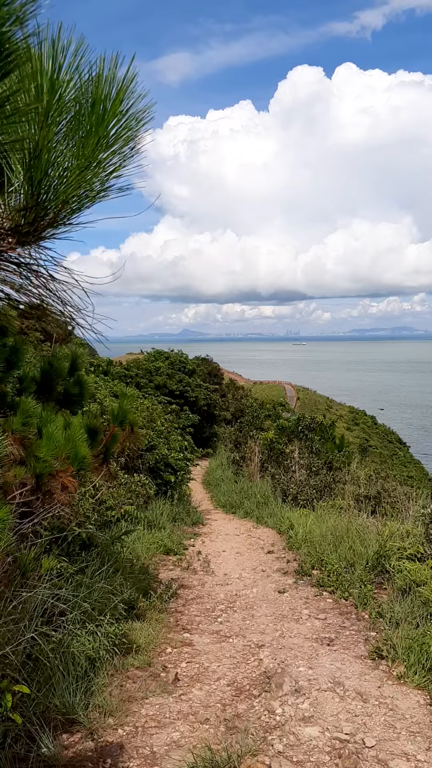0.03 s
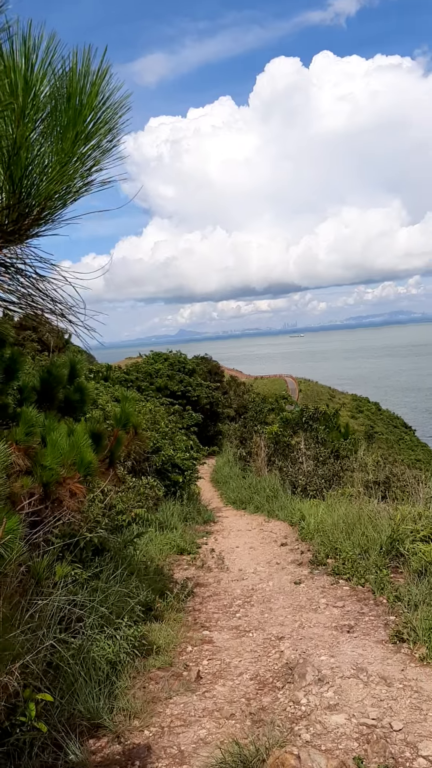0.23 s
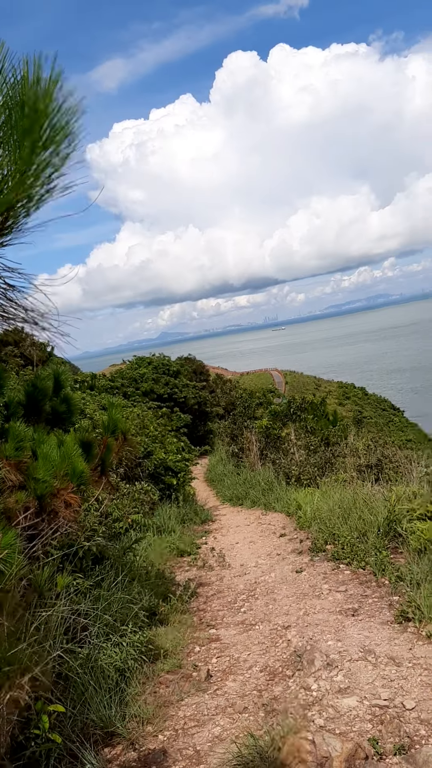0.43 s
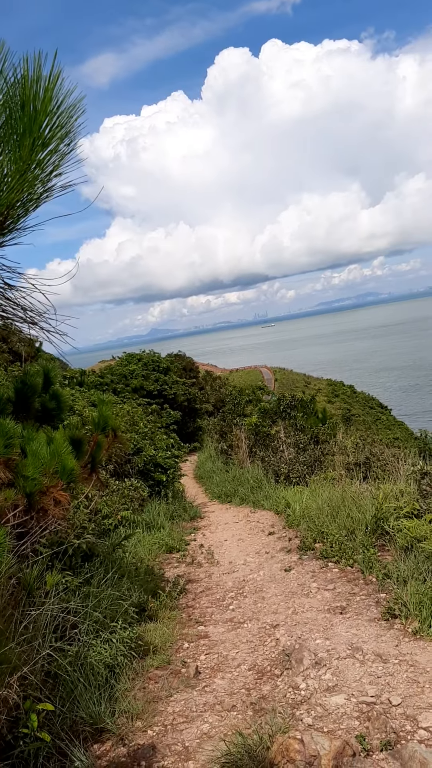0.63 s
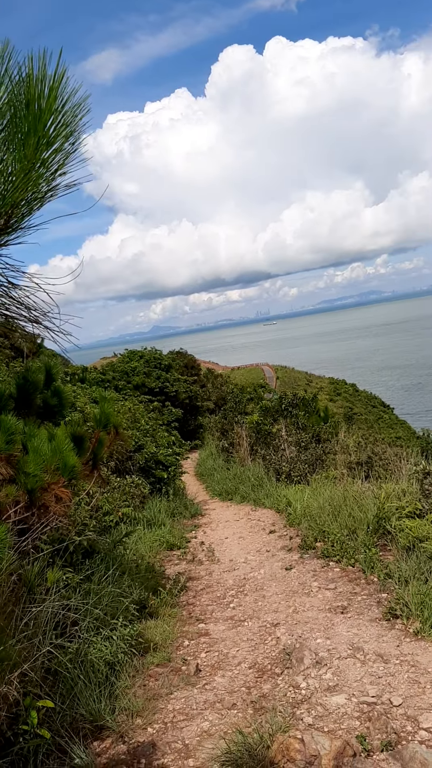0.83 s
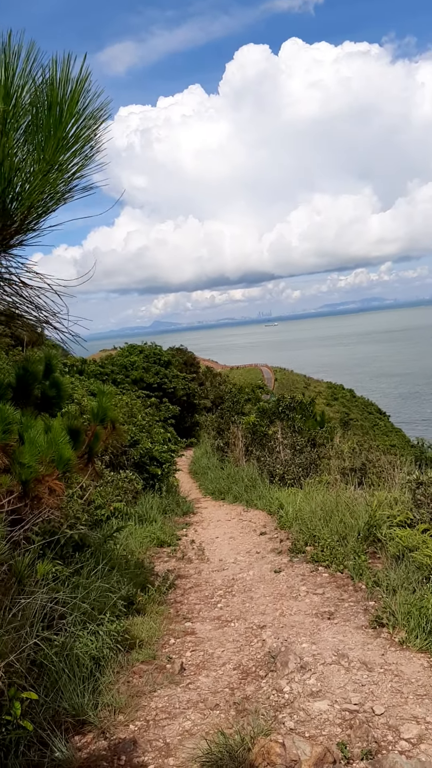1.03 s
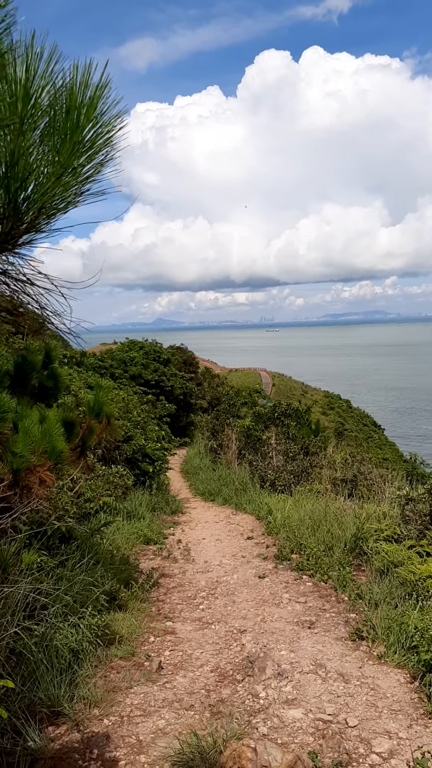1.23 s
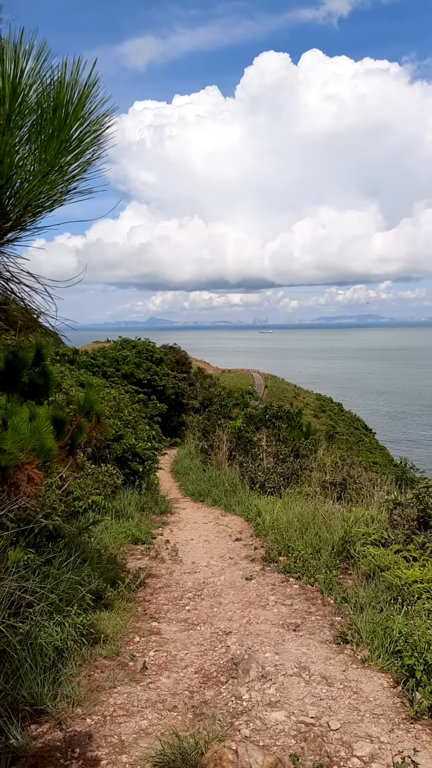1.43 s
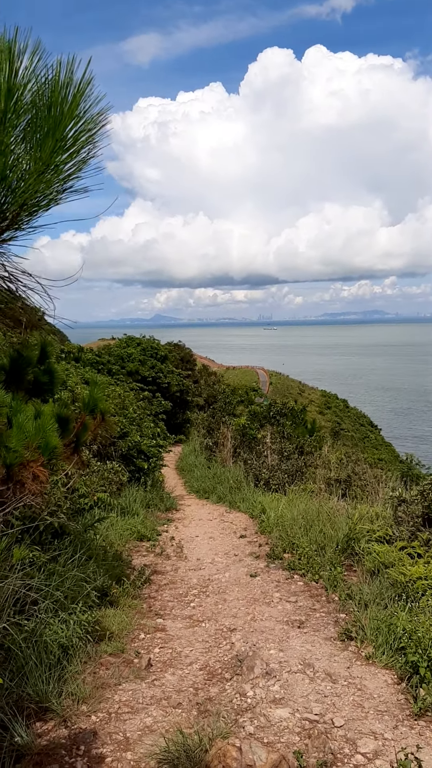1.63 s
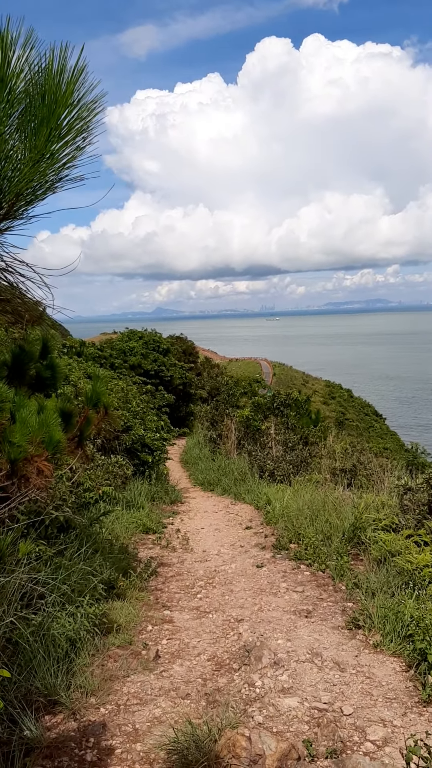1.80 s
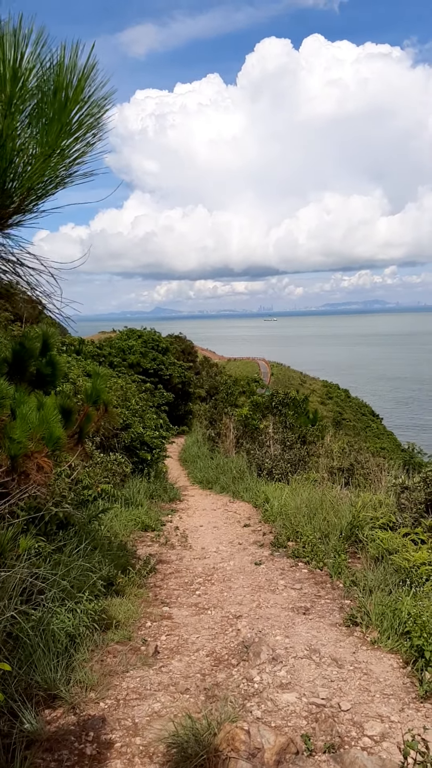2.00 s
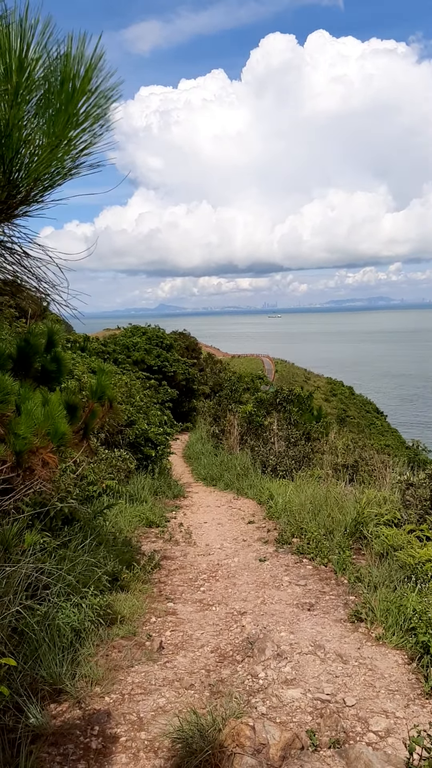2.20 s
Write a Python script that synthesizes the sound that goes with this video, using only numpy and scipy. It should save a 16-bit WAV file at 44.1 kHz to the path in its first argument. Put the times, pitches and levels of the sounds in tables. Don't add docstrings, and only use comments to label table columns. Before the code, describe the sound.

A close cicada sings a loud, unbroken, high rattling buzz over a faint low hum outdoors.

```python
import sys
import numpy as np
from scipy import signal
from scipy.fft import rfft, irfft, next_fast_len
from scipy.io import wavfile
from scipy.ndimage import uniform_filter1d, map_coordinates

SR = 44100
rng = np.random.default_rng(int(sys.argv[2]) if len(sys.argv) > 2 else 0)


def dump(signal):
    limited = np.clip(np.atleast_2d(signal).T, -1, 1)
    pcm = np.round(limited * 32767).astype(np.int16)
    wavfile.write(sys.argv[1], SR, pcm)


def rack_gain(trim_db):
    fader = np.asarray(trim_db, float)
    return 10 ** (fader / 20)


N = 99445


def unit(x):
    return x / np.sqrt(np.mean(x ** 2) + 1e-20)


def along(points, hz):
    f, v = np.transpose(points)
    return np.interp(np.log(hz + 1), np.log(f + 1), v)


def curves(rows, t):
    s, *columns = np.transpose(rows)
    return [np.interp(t, s, column) for column in columns]


def wobble(rate, t):
    return map_coordinates(rng.standard_normal(int(N * rate / SR) + 6), [t * rate])


def filtered(x, response):
    m = next_fast_len(N + 8192)
    return irfft(rfft(x, m) * response(np.fft.rfftfreq(m, 1 / SR)), m)[..., :N]


def mode(f, hz, width, db):
    return rack_gain(db) * 1j * f * width / (hz * hz - f * f + 1j * f * width)


def pulses(times, sizes):
    at = np.ravel(times)[:, None] * SR
    k = np.floor(at) + np.arange(-7, 9)
    shape = np.sinc(k - at) * np.cos(np.pi * (k - at) / 16) ** 2
    place = np.clip(k, 0, N + 9).astype(int)
    heights = shape * np.ravel(sizes)[:, None]
    return np.bincount(place.ravel(), heights.ravel(), N + 10)[:N]


def noise(points, patchy_db):
    z = signal.stft(rng.standard_normal((2, N)), nperseg=512)[2]
    field = uniform_filter1d(rng.standard_normal(z.shape), size=5, axis=1)
    field = uniform_filter1d(field, size=12, axis=2)
    pair = signal.istft(z * rack_gain(patchy_db * unit(field)), nperseg=512)[1][:, :N]
    return unit(filtered(pair, lambda hz: rack_gain(along(points, hz)) * (hz > 15)))


def buckling_cycles(t):
    # (time [s], rate [Hz])
    buckling = [(0.07, 215.4), (0.3, 215.45), (0.66, 215.75), (1.18, 216.2), (1.68, 216.8), (2.25, 217.2)]
    rate, = curves(buckling, t)
    cycles = np.cumsum(rate) / SR
    first_click_s = 0.0710
    return cycles - np.interp(first_click_s, t, cycles)


def song_band(f):
    below = 5240 / (1j * f + 1)
    above = 1j * f / 9070
    low_edge = 1 / (1 + np.sqrt(2) * below + below ** 2) ** 4
    high_edge = 1 / (1 + np.sqrt(2) * above + above ** 2) ** 3
    return low_edge * high_edge


def side_modes(f, side):
    # (frequency [Hz], width [Hz], first tymbal level [dB], second tymbal level [dB])
    body_modes = [(4928, 168, -9.5, 0.5), (5420, 546, -9.5, -8), (6328, 197, -18, -14.5),
                  (8597, 178, -32, -8), (9387, 203, -11.5, -8)]
    total = 0
    for k, (hz, width, *db) in enumerate(body_modes):
        total = total + (-1) ** k * mode(f, hz, width, db[side])
    return total


def rib_snap(f):
    lead_ms = 0.294
    return mode(f, 15070, 1900, 0) ** 2 * np.exp(2j * np.pi * f * lead_ms / 1000)


def cicada():
    # (time [s], level [dB], left-right balance [dB], brightness [0-1],
    # right shade [dB], side mode level [dB])
    song = [(0.07, -23.5, -0.5, 0.81, -2, -2), (0.21, -22.5, 3.5, 0.88, 3, 1.5),
            (0.33, -23, -0.5, 0.68, 2, 6), (0.51, -22.5, -2.5, 0.08, 3.5, 5), (0.66, -21.5, -4, 1, -2.5, 3),
            (0.75, -21.5, -4, 1, -3, -3), (1.01, -23.5, 1, 0.46, 4.5, -2),
            (1.18, -22.5, -0.5, 0.21, -9, -4), (1.24, -24.5, 4.5, 0.2, -6, -7.5),
            (1.37, -25, 3.5, 0.3, -18, -8), (1.68, -23.5, -1, 0.1, -15, -3.5), (1.78, -24, 0, 0.65, -4, -3),
            (1.9, -23, -1, 0.55, -20, -0.5), (1.98, -24.5, 1.5, 0.8, -6, 0.5),
            (2.08, -23.5, -2, 0.6, -1, -2.5), (2.25, -23.5, 1, 0.34, -13, -4.5)]
    # (delay [ms], left level [dB], right level [dB], drift [ms/s])
    late_arrivals = [(.55, -7, -3, 0.095), (.95, -15.5, -8, -0.049), (1.4, -14.5, -15, 0.14),
                     (1.9, -35, -14.5, -0.1), (2.9, -35, -14, 0.14), (3.7, -11.5, -9, -0.1)]
    second_place, second_db = 0.52, -1
    jitter_us, scatter_db = 3.6, 0.5
    right_lag_ms, sway_us, swell_db = 0.2189, 18.4, 3.5

    t = np.arange(N) / SR
    cycles = buckling_cycles(t)
    level_db, pan_db, brightness, shade_db, side_mode_db = curves(song, t)
    share = np.clip(brightness, 0, 1)
    paths = [[(wobble(1.516, t), wobble(2.515, t)) for echo in late_arrivals] for ear in range(2)]
    body, snap = np.zeros((2, N)), np.zeros((2, N))
    for side in range(2):
        even = np.interp(np.arange(-2, cycles[-1]) + side * second_place, cycles, t)
        i = (even * SR).astype(int)
        luck = rng.standard_normal((len(even), 2))
        at = even + jitter_us * 1e-6 * luck[:, 0]
        size = rack_gain(scatter_db * luck[:, 1] + side * second_db)
        for ear in range(2):
            times = [at + ear * right_lag_ms / 1000]
            sizes = [size * rack_gain(ear * shade_db[i])]
            for (ms, *db, drift), (sway, swell) in zip(late_arrivals, paths[ear]):
                delay_s = (ms + drift * (even - 1)) / 1000
                times.append(at + delay_s + sway_us * 1e-6 * sway[i])
                sizes.append(size * rack_gain(db[ear] + swell_db * swell[i]))
            clicks = pulses(times, sizes)
            body[ear] += filtered(clicks * rack_gain(side_mode_db), lambda f: song_band(f) * side_modes(f, side))
            body[ear] += filtered(clicks * np.sqrt(share), lambda f: song_band(f) * mode(f, 7940, 610, 0))
            body[ear] += filtered(clicks * np.sqrt(1 - share), lambda f: song_band(f) * mode(f, 7352, 425, 0))
            snap[ear] += rack_gain(side * 31) * filtered(clicks, rib_snap)
    power = np.abs(uniform_filter1d(body ** 2, size=9000, axis=1))
    steady = body / np.sqrt(power + 1e-12)
    snap_db = -28.5 + 3.5 * (t + 1.0)
    both = steady + rack_gain(snap_db) * unit(snap)
    return both * rack_gain(level_db + 2.0 + np.array([pan_db, -pan_db]) / 2)


def fly():
    # (start [s], length [s], start pitch [Hz], middle pitch [Hz], end pitch [Hz])
    passes = [
        (0.265, 0.197, 1290, 1389, 1275),
        (1.726, 0.11, 1413, 1438, 1650),
    ]
    t, whine = np.arange(N) / SR, np.zeros(N)
    for start, length, first, middle, last in passes:
        u = np.clip((t - start) / length, 0, 1)
        arc = np.sin(np.pi * u)
        hz = first + (last - first) * u + (middle - (first + last) / 2) * arc
        flutter = rack_gain(-57 + 3.1 * wobble(29.1, t))
        whine += flutter * arc ** 0.26 * np.sin(2 * np.pi * np.cumsum(hz) / SR)
    return whine * rack_gain([[2.5], [2.5]])


def twig():
    tick = filtered(pulses([1.1], [1]), lambda f: mode(f, 3500, 1100, 0) ** 2)
    return rack_gain(-27) * tick / tick.max() * rack_gain([[-6], [4]])


def far_chorus():
    # (frequency [Hz], level [dB])
    chorus_colour = [(3800, -46), (4800, 7), (6300, 13), (7800, 16.5), (9500, 2.5), (11500, -30),
                     (15000, -13), (16500, -39)]
    return rack_gain(-32) * noise(chorus_colour, patchy_db=2)


def open_air():
    # (frequency [Hz], level [dB])
    air_colour = [(150, 0), (400, -1), (1200, -4), (1700, -3), (2600, -16.5), (4000, -13), (6000, -48)]
    return rack_gain(-59) * noise(air_colour, patchy_db=1.5)


def port_breeze():
    # (frequency [Hz], level [dB])
    rumble_colour = [(13, -43), (22, -19.5), (64, 4.5), (132, -3), (167, -11.5), (190, -10), (250, -55),
                     (420, -120)]
    # (time [s], level [dB])
    gust_levels = [
        (0.07, -46),
        (0.08, -51),
        (0.29, -61.5),
        (0.4, -55),
        (0.64, -60),
        (1.99, -62.5),
        (2.02, -59.5),
        (2.25, -58),
    ]
    right_db = 5.5
    t = np.arange(N) / SR
    gust_db, = curves(gust_levels, t)
    lumps = rack_gain(2.8 * np.array([wobble(9.36, t), wobble(8.87, t)]))
    colour = [(15, -40)] + rumble_colour + [(300, -56)]
    rumble = unit(lumps * noise(colour, patchy_db=2.0))
    return rack_gain(gust_db + 2.5) * rumble * rack_gain([[-right_db / 2], [right_db / 2]])


def scene():
    return cicada() + fly() + twig() + far_chorus() + open_air() + port_breeze()


def microphone_hum(dry):
    # (frequency [Hz], level [dB])
    hum_colour = [(100, -25), (220, -2.5), (430, 0.5), (1500, -4.5), (2600, -9), (4000, -17.5), (9000, -49)]
    bent = filtered(dry ** 2, lambda hz: rack_gain(along(hum_colour, hz)) * (hz > 60))
    return bent * np.array([[0.56], [0.36]])


def top_cut(x):
    return signal.sosfilt(signal.butter(12, 16630, fs=SR, output="sos"), x)


def record(dry):
    heard = filtered(dry + microphone_hum(dry), lambda hz: hz < 15700)
    start_s, fade_s = 0.0695, 0.00044
    opening = np.clip((np.arange(N) / SR - start_s) / fade_s, 0, 1)
    return top_cut(heard * opening)


dry = scene()
out = record(dry)
dump(out)
```